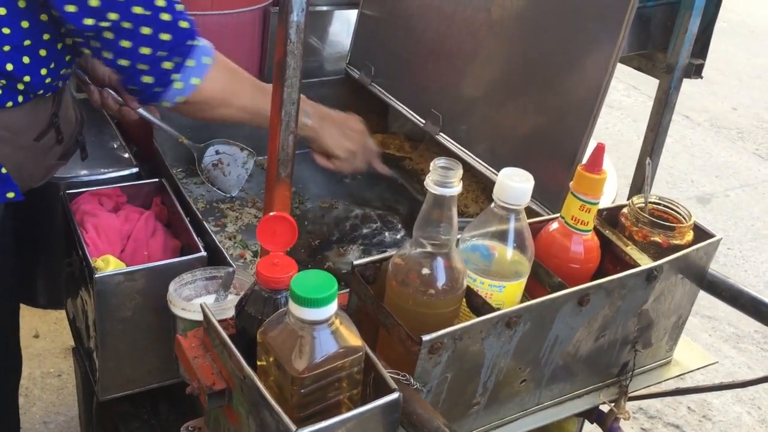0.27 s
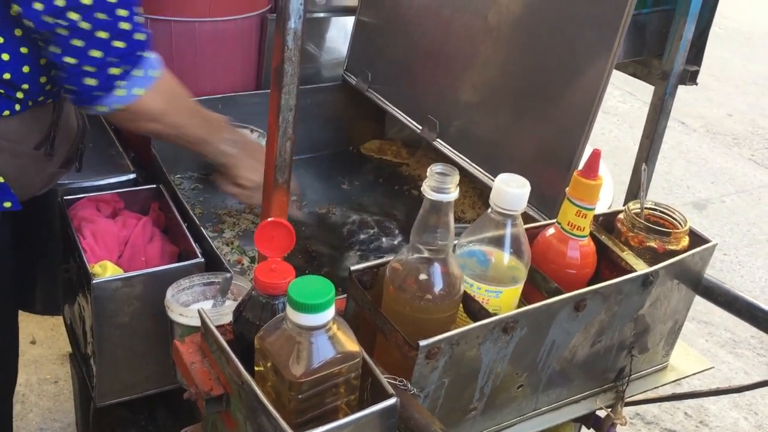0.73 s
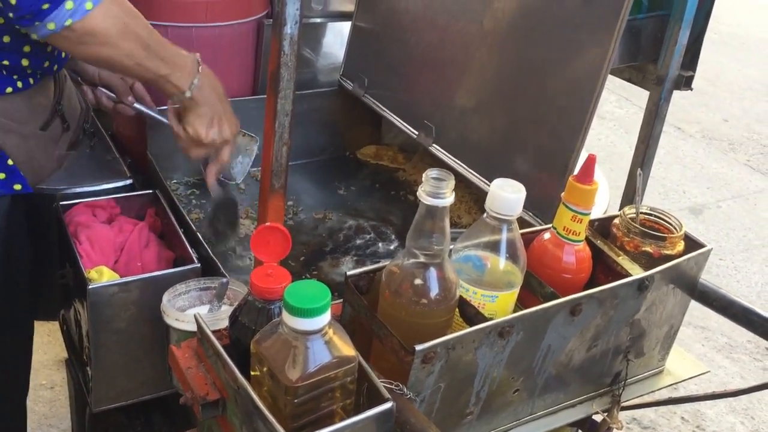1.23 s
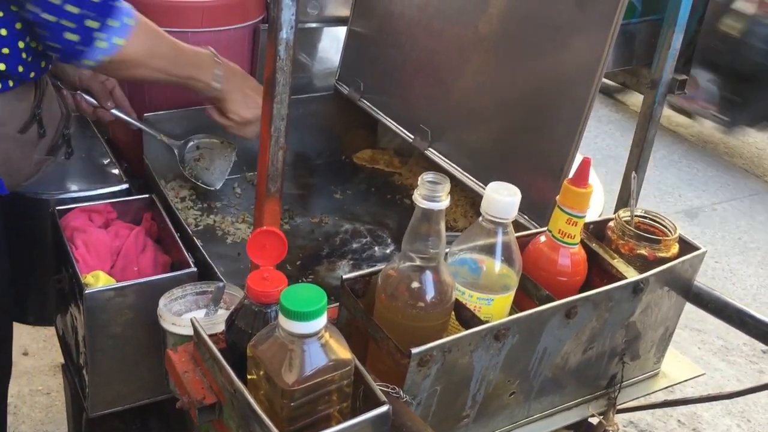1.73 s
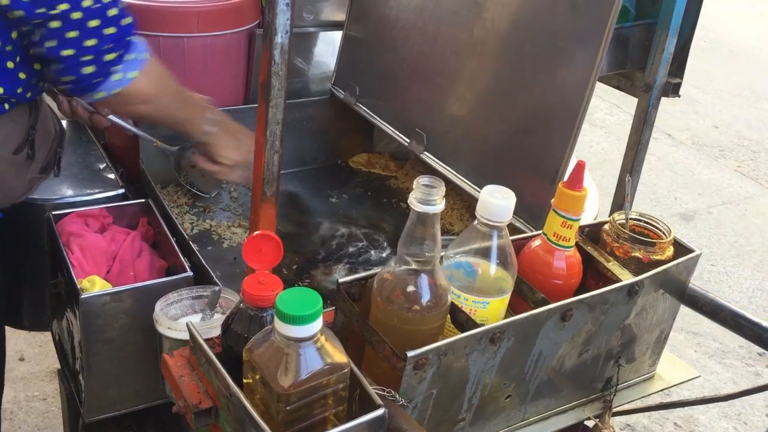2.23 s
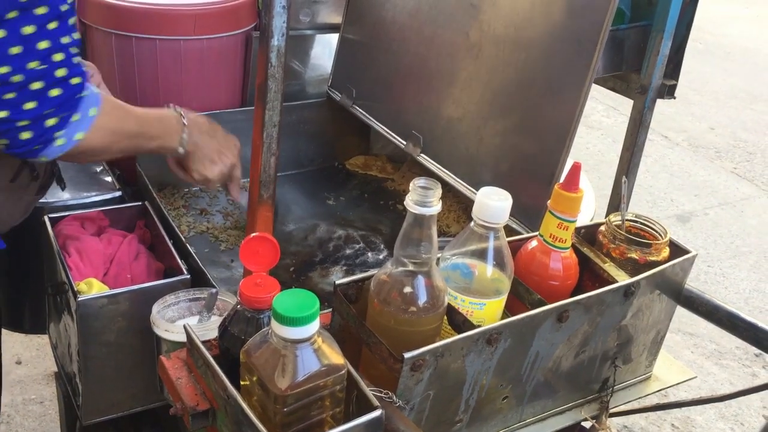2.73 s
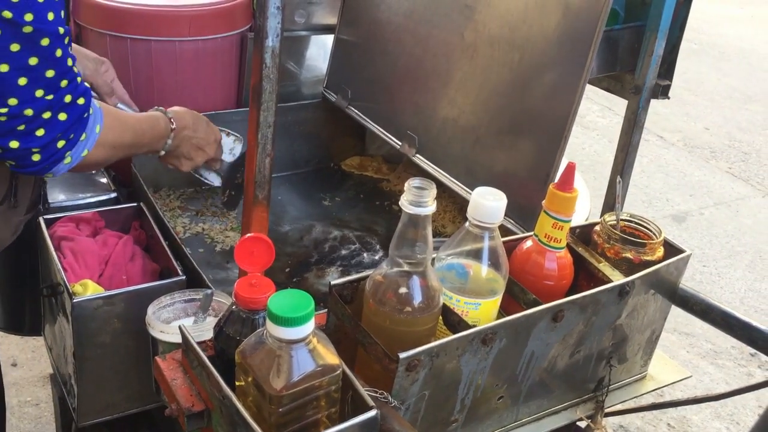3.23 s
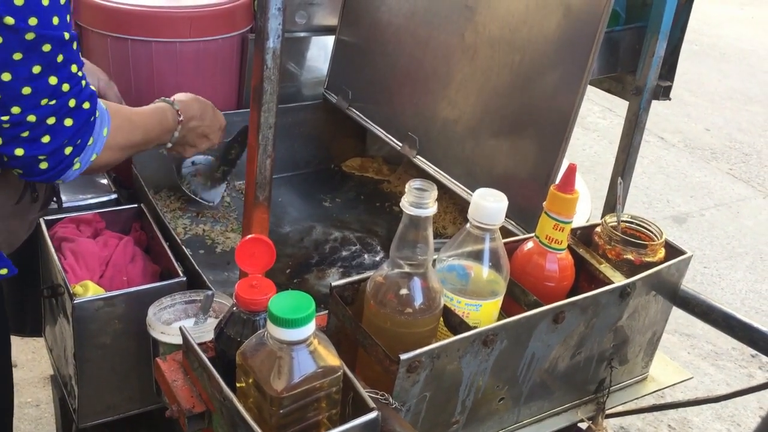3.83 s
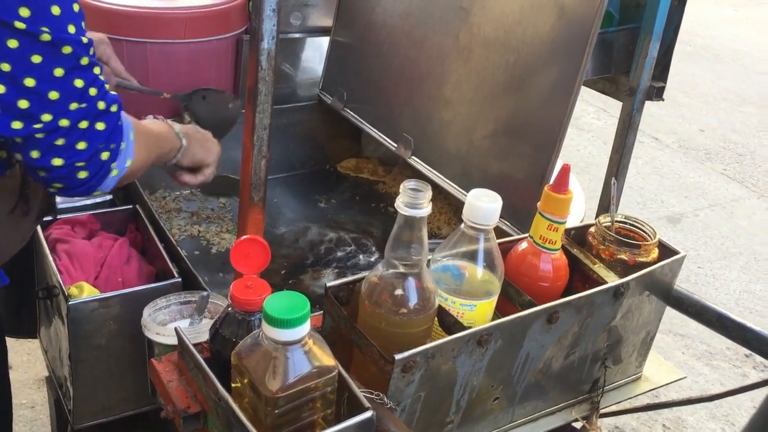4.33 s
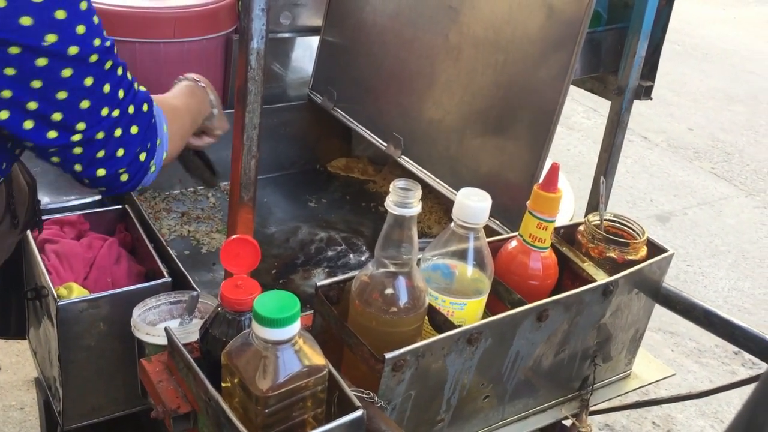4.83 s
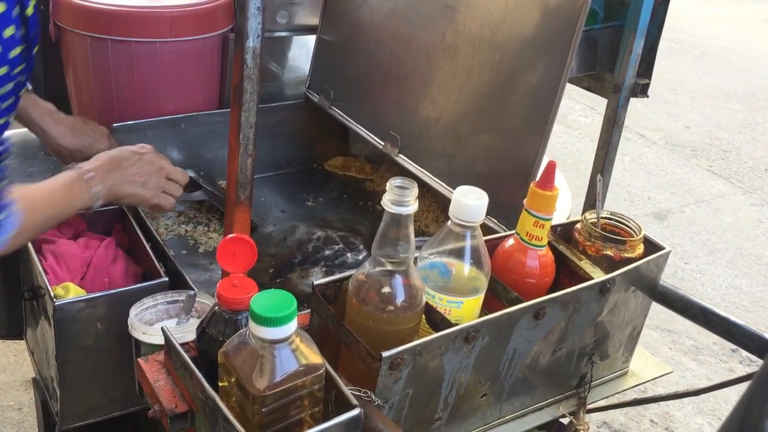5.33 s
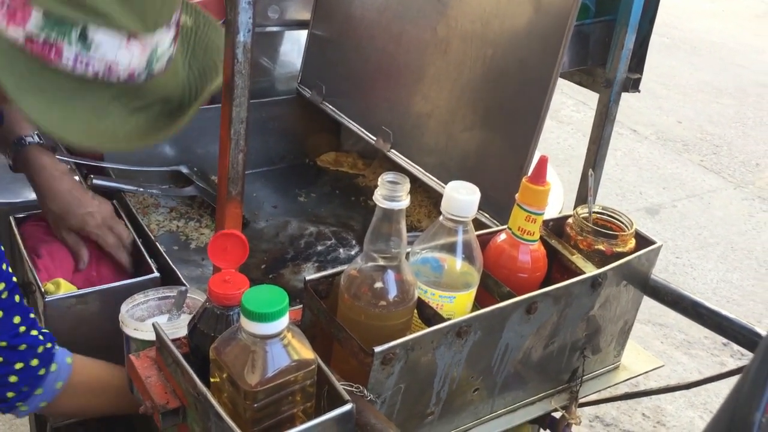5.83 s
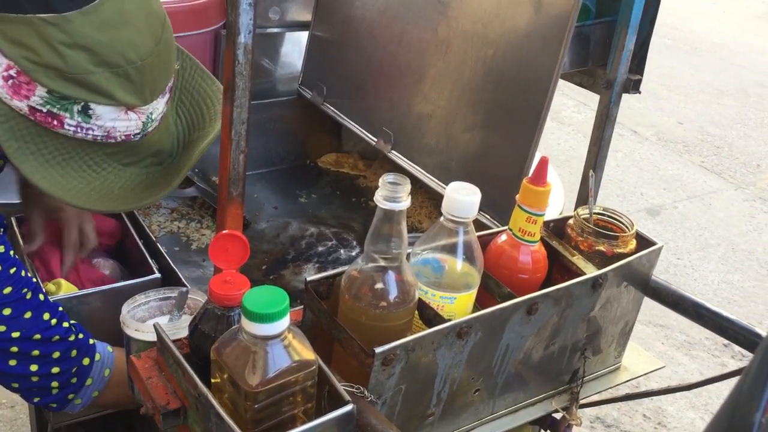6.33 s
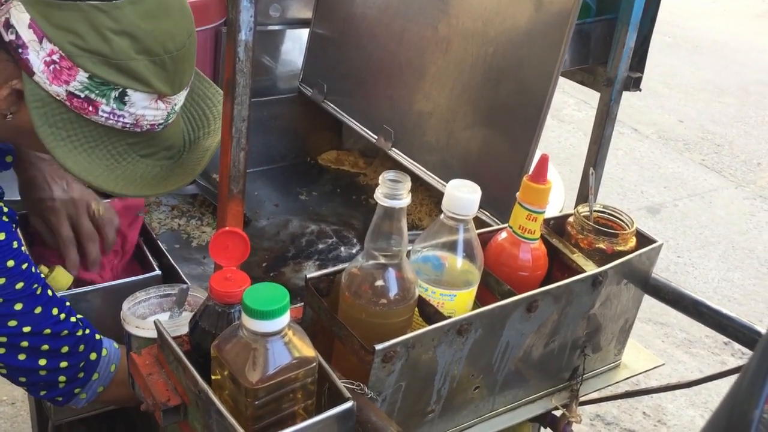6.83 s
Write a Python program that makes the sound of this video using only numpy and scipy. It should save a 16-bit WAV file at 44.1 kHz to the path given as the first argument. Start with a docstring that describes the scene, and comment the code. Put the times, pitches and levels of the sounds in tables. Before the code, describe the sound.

A metal spatula bangs and scrapes across a steel griddle, blades clink and swish together, then plastic bags rustle over low traffic rumble.

```python
"""Street food cart: a cook scrapes a flat steel griddle with a spatula, then taps and wipes it on a second one.
Oil sizzles during the scraping; both spatulas are dropped, and later a hand rummages in thin plastic bags.
A motorbike putters past over distant traffic.
Steel is filtered noise plus modes; sliding, crumbs, oil and film are random collisions shaped by spectra;
the exhaust is a pulse train through pipe resonances; the street is slowly varying noise."""
import sys
import numpy as np
from scipy import signal
from scipy.fft import rfft, irfft, next_fast_len
from scipy.io import wavfile
from scipy.ndimage import uniform_filter1d, map_coordinates

SR = 44100
rng = np.random.default_rng(int(sys.argv[2]) if len(sys.argv) > 2 else 0)


def generate_wav(sig):
    """Save sig (samples, or channels by samples) to the path in sys.argv[1] as 16-bit PCM at SR."""
    pcm = np.round(np.clip(np.atleast_2d(sig).T, -1, 1) * 32767).astype(np.int16)
    wavfile.write(sys.argv[1], SR, pcm)


N = 312039


def amp(db):
    """Decibels to gain."""
    return 10 ** (np.asarray(db) / 20)


def unit(x):
    """x at rms 1."""
    return x / np.sqrt(np.mean(x ** 2) + 1e-20)


def curve(rows):
    """Interpolate (time_s, value) rows to one value per sample."""
    time_s, value = np.transpose(rows)
    return np.interp(np.arange(N) / SR, time_s, value)


def wobble(rate_hz, count=N):
    """Smooth random curve with rate_hz knots a second."""
    knots = rng.standard_normal(int(count * rate_hz / SR) + 4)
    return map_coordinates(knots, [np.arange(count) * rate_hz / SR])


def filtered(x, response):
    """x times a response of frequency in Hz."""
    size = next_fast_len(len(x) + 8192)
    spectrum = rfft(x, size) * response(np.fft.rfftfreq(size, 1 / SR))
    return irfft(spectrum, size)[:len(x)]


def coloured(x, spectrum):
    """x shaped by (freq_hz, level_db) points on a log frequency axis, at rms 1."""
    freq_hz, level_db = np.transpose(spectrum)
    return unit(filtered(x, lambda f: amp(np.interp(np.log(f + 1), np.log(freq_hz), level_db))))


def resonated(x, modes):
    """x through parallel resonances of alternating sign, at rms 1."""
    def bank(f):
        total = 0
        for k, (centre_hz, width_hz, level_db) in enumerate(modes):
            damping = 1j * f * width_hz
            total = total + (-1) ** k * amp(level_db) * damping / (centre_hz ** 2 - f * f + damping)
        return total
    return unit(filtered(x, bank))


def split(x, hz):
    """Parts of x below and above a frequency."""
    low = filtered(x, lambda f: 1 / (1 + (f / hz) ** 6))
    return low, x - low


def registers(x):
    """Boom, clang and hiss of the steel."""
    boom, rest = split(x, hz=520)
    clang, hiss = split(rest, hz=4500)
    return boom, clang, hiss


def grit(count, rate_hz, spread_db):
    """Random tiny collisions of uneven size, rate_hz a second on average, at rms 1."""
    hit = rng.random(count) < rate_hz / SR
    size = rng.standard_normal(count) * amp(spread_db * rng.standard_normal(count))
    return unit(hit * size)


def streaked(x, depth_db):
    """Make narrow bands swell and fade at random, at rms 1."""
    z = signal.stft(np.pad(x, (0, 512)), nperseg=512)[2]
    field = uniform_filter1d(rng.standard_normal(z.shape), size=3, axis=0)
    field = uniform_filter1d(field, size=7, axis=1)
    return unit(signal.istft(z * amp(depth_db * unit(field)), nperseg=512)[1][:len(x)])


SWELL_DB = 19.5  # gained over the rise, lost again over the release


def stroke(t, rise_s, hold_s, release_s):
    """Gain of one stroke, t seconds after its start: the hand presses in, holds and lets go."""
    slack = np.maximum(1 - t / rise_s, 0) + np.maximum(t - rise_s - hold_s, 0) / release_s
    touch = np.clip(t / 0.005, 0, 1)
    return touch * amp(-SWELL_DB * slack)


def strokes(rows):
    """Summed gain of a series of strokes, one value per sample."""
    t = np.arange(N) / SR
    gain = np.zeros(N)
    for start_s, rise_s, hold_s, release_s, level_db in rows:
        gain += amp(level_db) * stroke(t - start_s, rise_s, hold_s, release_s)
    return gain


def add(track, start_s, sound):
    """Mix a sound into the track at start_s."""
    part = track[max(round(start_s * SR), 0):][:len(sound)]
    part += sound[:len(part)]


GRIP_DETUNE = 0.0055  # rms share by which grip and point of contact shift each mode


def ring(modes, t, sustain):
    """Struck modes, reweighted and detuned by each blow; wide modes die fast, sustain slows all decays."""
    freq_hz, width_hz, level_db = np.transpose(modes)[:, :, None]
    size = amp(level_db + 3 * rng.standard_normal(freq_hz.shape)) * width_hz
    freq_hz = freq_hz * (1 + GRIP_DETUNE * rng.standard_normal(freq_hz.shape))
    decay = np.exp(-np.pi * width_hz * t / sustain)
    waves = np.sin(2 * np.pi * (freq_hz * t + rng.random(freq_hz.shape))) * decay
    return np.sum(size * waves, axis=0) / np.sqrt(np.sum(size ** 2) / 2)


# strokes over the griddle: start_s, rise_s, hold_s, release_s, level_db, hiss_gain_db
SCRAPE_STROKES = [(0.238, 0.024, 0.011, 0.05, -30, -6.5), (0.541, 0.022, 0.046, 0.038, -28, -4.5),
                  (0.807, 0.07, 0.038, 0.1, -20.5, -4), (1.245, 0.026, 0.13, 0.047, -26, 0.5),
                  (1.631, 0.016, 0.11, 0.043, -24.5, -3.5), (1.985, .05, 0.014, 0.074, -21.5, -4),
                  (2.306, 0.069, 0.036, 0.076, -23.5, -1.5), (2.729, 0.051, 0.063, 0.07, -22.5, -6.5),
                  (5.252, 0.024, 0.073, 0.17, -29, -13), (5.355, 0.011, 0.016, 0.085, -28, -6)]
# griddle modes, spatula pressed on it: freq_hz, width_hz, level_db
PLATE_MODES = [(150, 16, 4), (174, 20, 3), (222, 24, -1), (252, 22, -1), (342, 24, -6), (393, 36, 2),
               (497, 24, -2), (591, 28, -2), (645, 34, -3), (781, 30, -4), (1032, 36, -1), (1095, 40, -4),
               (1212, 40, -2), (1346, 28, -1), (1464, 36, -3), (1850, 40, -6), (1953, 45, 0), (2157, 36, 3),
               (2424, 50, -1), (2660, 50, -6), (2800, 50, -6), (3032, 40, -6), (3313, 50, -10),
               (4170, 90, -10), (4500, 41, -15), (5220, 36, -13), (5520, 52, -13), (5843, 34, -12),
               (6140, 30, -14), (6569, 60, -10)]
# crowded plate modes under scraping: freq_hz, level_db_per_hz
GRIND_SPECTRUM = [(90, -34), (190, -2.5), (400, -12), (800, 0.5), (1100, 3), (2800, -2), (3700, -10.5),
                  (4300, -10.5), (5000, -15.5), (6500, -16.5), (7800, -21.5), (9500, -17.5), (13000, -19),
                  (16000, -21.5)]
JUDDER_DB, JUDDER_RATE_HZ = 1, 77.3  # stutter over the crust: depth, knots a second
PLATE_STREAK_DB = 4
BOOM_DB, BOOM_GROWS = -31, 0.5  # same boom in every stroke; exponent < 1: present at light pressure
HISS_GROWS = 1.21  # exponent > 1: needs firm pressure


def scrapes():
    """The edge catches on burnt crust thousands of times a second and shakes the plate; pressure brightens it."""
    out, t = np.zeros(N), np.arange(SR // 3) / SR
    for start_s, rise_s, hold_s, release_s, level_db, hiss_gain_db in SCRAPE_STROKES:
        pressure = stroke(t, rise_s, hold_s, release_s)
        judder = amp(JUDDER_DB * wobble(JUDDER_RATE_HZ, len(t)))
        catches = judder * grit(len(t), rate_hz=9000, spread_db=2)
        crowded = streaked(coloured(catches, GRIND_SPECTRUM), depth_db=PLATE_STREAK_DB)
        modes = resonated(judder * grit(len(t), rate_hz=3000, spread_db=2), PLATE_MODES)
        boom, clang, hiss = registers(crowded + amp(-2.5) * modes)
        edge = pressure * unit(clang)
        edge += amp(hiss_gain_db) * pressure ** HISS_GROWS * unit(hiss)
        plate_boom = amp(BOOM_DB) * pressure ** BOOM_GROWS * unit(boom)
        add(out, start_s, amp(level_db) * edge + plate_boom)
    return out


# spatula lands on the griddle: start_s, level_db, boom_gain_db, treble_gain_db
PLATE_BLOWS = [(0.176, -12, -10, -9), (0.198, -0.5, -20, -3.5), (0.541, -21.5, -4.5, -15),
               (0.813, -22.5, 1.5, -23), (1.204, -9.5, -9.5, -6.5), (1.261, -15.5, -11, -14),
               (1.623, -8.5, -12.5, -4.5), (1.973, -19, -1, -10), (2.313, -27.5, 2.5, -20),
               (2.737, -35, 14, -3), (5.244, -9.5, -11.5, -11), (5.297, -16.5, -14, -7.5),
               (5.368, -15, -2.5, -10), (5.383, -16, -3.5, -19)]
# crowded plate modes under a blow: freq_hz, level_db_per_hz
CLANG_SPECTRUM = [(70, -41), (150, -5), (400, -9.5), (800, -0.5), (1100, 4), (2300, 5), (3500, -6),
                  (6500, -8.5), (7800, -11.5), (10000, -11.5), (16000, -10)]
CLANG_T60_S, BOOM_T60_S, HISS_T60_S = 0.15, 0.0555, 0.084  # noise parts only


def blows():
    """The spatula's edge hits the plate: a short thud, then its modes ring on while the treble dies."""
    out, t = np.zeros(N), np.arange(SR // 3) / SR
    low_modes = [mode for mode in PLATE_MODES if mode[0] < 550]
    high_modes = PLATE_MODES[len(low_modes):]
    for start_s, level_db, boom_gain_db, treble_gain_db in PLATE_BLOWS:
        boom, clang, hiss = registers(coloured(rng.standard_normal(len(t)), CLANG_SPECTRUM))
        sound = amp(-5 - 60 * t / CLANG_T60_S) * unit(clang)
        sound += amp(-2) * ring(high_modes, t, sustain=1.6)
        thump = amp(5 - 60 * t / BOOM_T60_S) * unit(boom) + ring(low_modes, t, sustain=2.2)
        sound += amp(boom_gain_db) * thump * (1 - np.exp(-t / 0.0009))
        sound += amp(treble_gain_db - 60 * t / HISS_T60_S) * unit(hiss)
        attack = 1 - np.exp(-t / 0.0026)
        add(out, start_s, amp(level_db) * sound * attack)
    return out


# blade strikes blade: start_s, level_db, treble_gain_db, top_gain_db, buzz_t60_s
BLADE_TAPS = [(3.034, -12, 3.5, 5.5, 0.053), (3.346, -5.5, -2, 4.5, 0.037), (3.563, -15.5, -19, 6, 0.022),
              (3.77, -12, -0.5, 2, 0.03), (4.13, -8, -5.5, 6, 0.07), (4.58, -7.5, 1, 3.5, 0.046),
              (4.933, -19.5, -7, 10, 0.091), (5.312, -15.5, -3.5, 7.5, 0.07), (5.446, -13.5, -2, 6.5, 0.11)]
# free blade modes: freq_hz, width_hz, level_db
BLADE_MODES = [(1030, 50, -3), (1830, 68, 0), (2380, 72, -4), (3310, 51, -2), (3830, 90, -7),
               (4440, 110, -9), (4980, 35, -12), (5580, 54, -4), (5810, 44, -6), (6200, 41, -5),
               (6500, 110, -1), (7070, 40, -10), (8290, 92, -12), (8870, 41, -5), (9580, 25, -10),
               (10000, 160, -8), (10800, 54, -12), (11100, 57, -12), (11600, 74, -13), (12000, 39, -11),
               (12400, 140, -9), (12800, 220, -10), (13300, 170, -13), (13900, 210, -14), (14400, 54, -15),
               (14900, 200, -11)]
# crowded blade modes under a tap: freq_hz, level_db_per_hz
CLINK_SPECTRUM = [(300, -41), (700, 14), (1700, 15.5), (2800, 14.5), (3600, 8.5), (4300, 11), (5100, 8.5),
                  (6400, 17.5), (7700, 3), (9200, 11), (16000, -12)]


def taps():
    """The hand-held blades clink together, buzz in contact for a moment and are damped at once."""
    out, t = np.zeros(N), np.arange(SR // 4) / SR
    for start_s, level_db, treble_gain_db, top_gain_db, buzz_t60_s in BLADE_TAPS:
        buzz = coloured(rng.standard_normal(len(t)), CLINK_SPECTRUM)
        buzz *= amp(-60 * np.maximum(t - 0.002, 0) / buzz_t60_s)
        low, high = split(amp(-5) * buzz + ring(BLADE_MODES, t, sustain=1.2), hz=4000)
        treble, top = split(high, hz=11000)
        sound = low + amp(treble_gain_db) * treble + amp(top_gain_db) * top
        attack = 1 - np.exp(-t / 0.0013)
        add(out, start_s, amp(level_db) * sound * attack)
    return out


# strokes of blade along blade: start_s, rise_s, hold_s, release_s, level_db, top_gain_db
BLADE_WIPES = [(3.052, 0.011, 0.092, 0.022, -33.5, 0), (3.382, 0.044, 0.0063, 0.075, -44, -11),
               (3.488, 0.054, 0.024, 0.013, -32, -5), (3.791, 0.028, 0.066, 0.11, -31.5, -2.5),
               (3.921, 0.027, 0.0093, 0.0083, -30, -3), (4.171, 0.068, 0.077, 0.03, -34, -1),
               (4.359, 0.03, 0.015, 0.017, -44, 10), (4.609, 0.078, 0.049, 0.025, -32.5, -0.5),
               (4.954, 0.041, 0.012, 0.028, -41, -3), (5.117, 0.027, .005, .035, -49, -14)]
# crowded blade modes under sliding: freq_hz, level_db_per_hz
SWISH_SPECTRUM = [(400, -1), (1300, 0.5), (1750, 9.5), (2600, 2), (3600, 0), (4300, 7), (4950, -2.5),
                  (6000, 6.5), (7800, -7), (9600, -2), (12400, -11), (16000, -8)]
BLADE_STREAK_DB = 5


def wipes():
    """Blade slides on blade; one resonance sinks as the contact travels towards the tip."""
    out, t = np.zeros(N), np.arange(SR // 4) / SR
    for start_s, rise_s, hold_s, release_s, level_db, top_gain_db in BLADE_WIPES:
        catches = grit(len(t), rate_hz=9000, spread_db=2) * amp(1.6 * wobble(110, len(t)))
        steel = coloured(catches, SWISH_SPECTRUM) + amp(-7.5) * resonated(catches, BLADE_MODES)
        steel = streaked(steel, depth_db=BLADE_STREAK_DB)
        zing_hz = np.interp(t, [0, rise_s + hold_s + release_s], [3250, 2750])
        zing = unit(wobble(120, len(t)) * np.sin(2 * np.pi * np.cumsum(zing_hz) / SR))
        body, top = split(steel + amp(-10) * zing, hz=9000)
        sound = unit(body) + amp(top_gain_db) * unit(top)
        add(out, start_s, amp(level_db) * stroke(t, rise_s, hold_s, release_s) * sound)
    return out


# light pushes of crumbs over the plate: start_s, rise_s, hold_s, release_s, level_db
CRUMB_PUSHES = [(0, 0.048, 0.091, .1, -37), (1.78, 0.12, 0.61, 0.2, -37), (2.6, 0.052, 0.037, 0.12, -37.5)]


def crumbs():
    """Loose crumbs roll under the blade in little spurts and faintly sound the plate."""
    spurts = grit(N, rate_hz=7000, spread_db=2) * amp(1.8 * wobble(50))
    spectrum = [(150, -11), (400, -4.5), (2400, -10.5), (4500, -23.5), (8000, -25), (16000, -34)]
    return strokes(CRUMB_PUSHES) * coloured(spurts, spectrum)


def cart(x):
    """The steel lid and walls of the cart throw back a short tail: decaying noise, t60 46 ms."""
    t = np.arange(SR // 3) / SR
    tail = rng.standard_normal(len(t)) * amp(-60 * t / 0.046) * (t > 0.004)
    return signal.fftconvolve(x, tail / np.linalg.norm(tail))[:N]


# oil flares up as the food is turned: start_s, level_db
OIL_FLARES = [(0, -67), (0.6, -54), (1.78, -50), (2.6, -71)]
FLARE_FADE_DB_PER_S = 28


def sizzle():
    """Tiny bubbles burst in the hot oil, in clusters; each flare slowly dies down."""
    t = np.arange(N) / SR
    heat = np.zeros(N)
    for start_s, level_db in OIL_FLARES:
        heat += (t >= start_s) * amp(level_db - FLARE_FADE_DB_PER_S * (t - start_s))
    pops = grit(N, rate_hz=1800, spread_db=2) * amp(3 * wobble(45))
    return heat * coloured(pops, [(1200, -20), (3500, -11), (9000, -4), (16000, -5)])


# rummaging fingers: start_s, rise_s, hold_s, release_s, level_db
BAG_RUSTLES = [(5.86, 0.094, 0.037, .1, -51.5), (6.03, 0.027, 0.18, .25, -58.5),
               (6.34, 0.032, .004, 0.022, -47), (6.4, 0.18, 0.1, 0.07, -51), (6.88, 0.11, .1, .1, -69)]
# bundle of bags rubs along its steel bin: start_s, rise_s, hold_s, release_s, level_db
BIN_RUBS = [(5.93, 0.073, .02, .1, -36.5), (6.86, 0.043, 0.046, 0.19, -38.5), (7.0, .05, .025, .05, -34.5)]
# tugs at the bags: start_s, level_db, pitch_hz
BAG_TUGS = [(5.9436, -33, 2050), (5.9797, -28.5, 2430), (6.2244, -46, 1740), (6.9162, -33, 2370)]
# plastic film crackle: freq_hz, level_db_per_hz
FILM_SPECTRUM = [(800, -16), (2500, -6), (5500, 6), (7500, -2.5), (10000, 2), (16000, -3)]


def bags():
    """Thin plastic crackles under the fingers, snaps at each tug and rubs along the bin."""
    crackle = grit(N, rate_hz=2500, spread_db=4) * amp(2.5 * wobble(35))
    rub_spectrum = [(100, -15), (230, 6.5), (550, -2), (900, -8), (2500, -12.5), (7000, -42)]
    rub = coloured(rng.standard_normal(N), rub_spectrum)
    out = strokes(BAG_RUSTLES) * coloured(crackle, FILM_SPECTRUM) + strokes(BIN_RUBS) * rub
    t = np.arange(SR // 10) / SR
    attack = 1 - np.exp(-t / 0.0015)
    for start_s, level_db, pitch_hz in BAG_TUGS:
        snap = resonated(rng.standard_normal(len(t)), [(pitch_hz, 0.29 * pitch_hz, 0)])
        add(out, start_s, amp(level_db - 60 * t / 0.044) * snap * attack)
    return out


# engine speed: time_s, firings_per_s
FIRING_RATE = [(0, 17.6), (.5, 17.6), (.9, 18.7), (1.5, 18.3), (2, 17.8), (3, 17.1), (3.6, 16.6),
               (4.5, 16.8), (5.3, 17.4), (7.08, 15.6)]
# exhaust loudness: time_s, level_db
EXHAUST_LEVEL = [(0, -38), (1, -32.5), (2, -38), (2.7, -30), (3.7, -32), (4.6, -30), (5.5, -34.5),
                 (6.2, -36), (7.08, -33)]
# exhaust pipe resonances: freq_hz, width_hz, level_db
PIPE_MODES = [(54, 8.8, -3), (68.6, 10.5, -2), (101.9, 14.8, -2.5), (160, 28, -13)]


def motorbike():
    """One slightly uneven puff per firing rings the exhaust pipe."""
    firings = np.diff(np.floor(np.cumsum(curve(FIRING_RATE)) / SR), prepend=0)
    puffs = resonated(firings * amp(0.38 * wobble(6.8)), PIPE_MODES)
    # the silencer passes only a low band
    silenced = coloured(puffs, [(25, -36), (50, 2.5), (180, 5), (400, -31), (1500, -50)])
    return amp(curve(EXHAUST_LEVEL)) * silenced


# engine rumble and tyre noise: time_s, level_db
RUMBLE_LEVEL = [(0, -22.5), (.5, -26.5), (2.2, -24.5), (3, -27.5), (5, -30.5), (6.4, -32), (7.08, -28)]
TYRE_LEVEL = [(0, -41.5), (1.5, -39), (2.5, -43.5), (3.3, -41), (4, -43), (6.3, -44), (7.08, -41.5)]
# their spectra: freq_hz, level_db_per_hz
RUMBLE_SPECTRUM = [(22, -50), (32, -25), (45, -11.5), (65, -2.5), (105, -0.5), (150, -10), (220, -14),
                   (320, -20.5), (500, -37), (1200, -79)]
TYRE_SPECTRUM = [(120, -20), (300, 2), (500, 0), (800, 0), (1300, 1), (2000, -2), (3200, -8), (5500, -12.5),
                 (7500, -20), (10000, -22), (16000, -30)]


def traffic():
    """Distant engines rumble under the wash of tyres: two noise bands of drifting level."""
    rumble = coloured(rng.standard_normal(N), RUMBLE_SPECTRUM) * amp(1.4 * wobble(8))
    wash = streaked(coloured(rng.standard_normal(N), TYRE_SPECTRUM), depth_db=1.8)
    wash *= amp(0.7 * wobble(12))
    return amp(curve(RUMBLE_LEVEL)) * rumble + amp(curve(TYRE_LEVEL)) * wash


def scene():
    """The cook's work in front of the street; only the steel and crumbs get the cart's tail."""
    steel = scrapes() + blows() + taps() + wipes() + crumbs()
    street = motorbike() + traffic()
    return (steel + amp(-12.5) * cart(steel) + sizzle() + bags() + street)[None]


TOP_HZ = 16000


def record(dry):
    """Peaks clip at full scale; nothing is kept from TOP_HZ up."""
    clipped = np.clip(dry[0], -1, 1)
    return filtered(clipped, lambda f: f < TOP_HZ)[None]


dry = scene()
out = record(dry)
generate_wav(out)
```